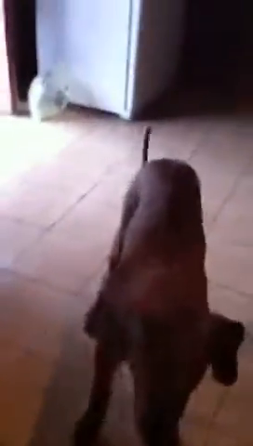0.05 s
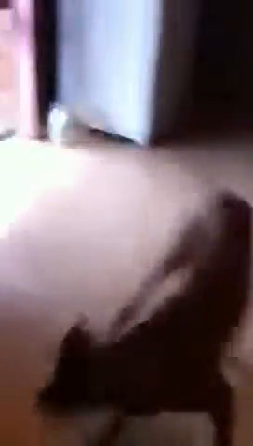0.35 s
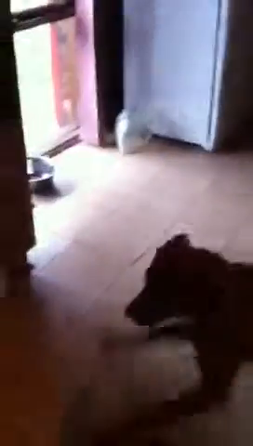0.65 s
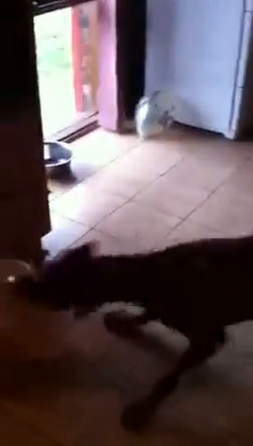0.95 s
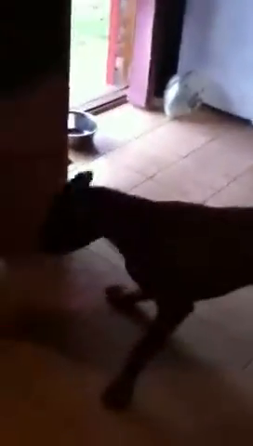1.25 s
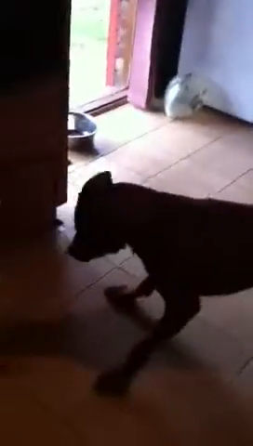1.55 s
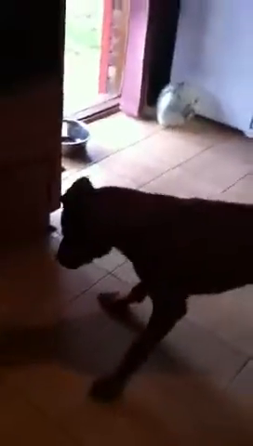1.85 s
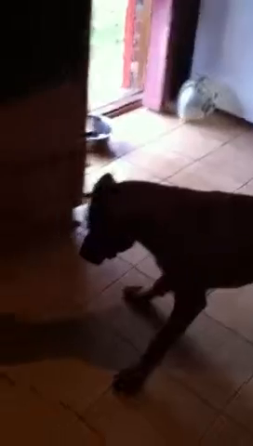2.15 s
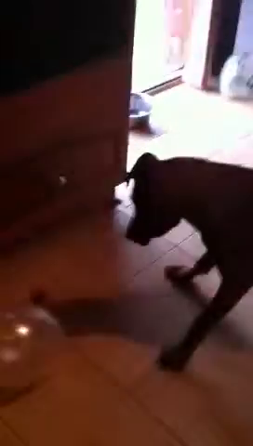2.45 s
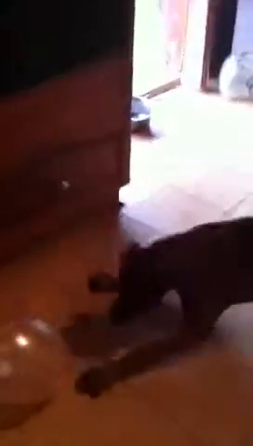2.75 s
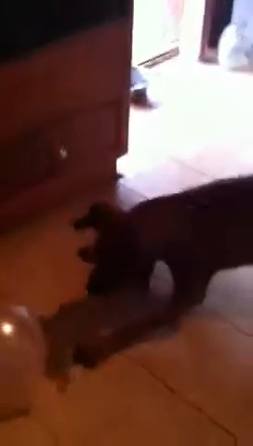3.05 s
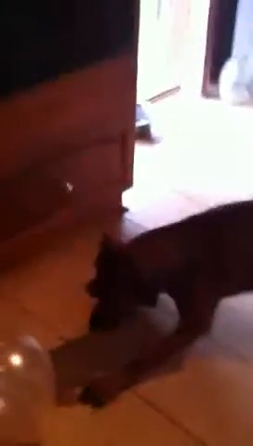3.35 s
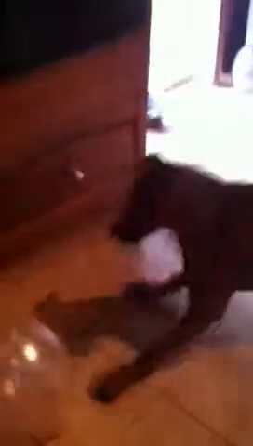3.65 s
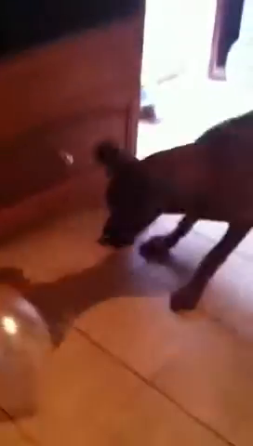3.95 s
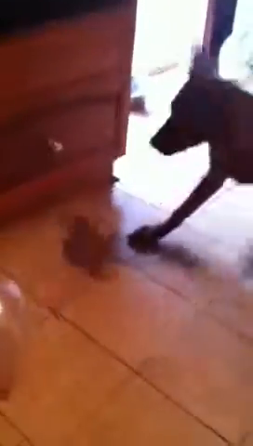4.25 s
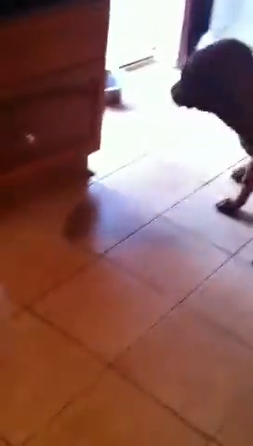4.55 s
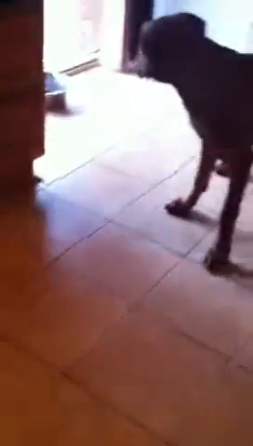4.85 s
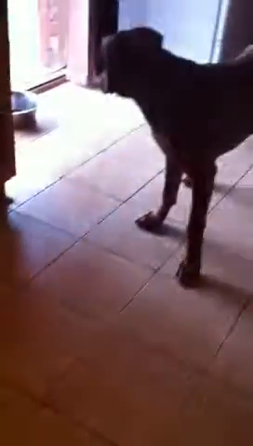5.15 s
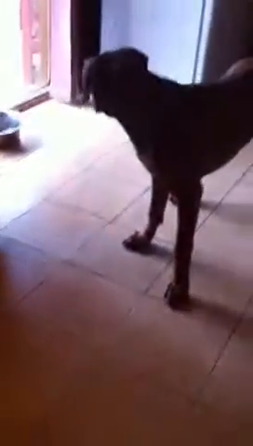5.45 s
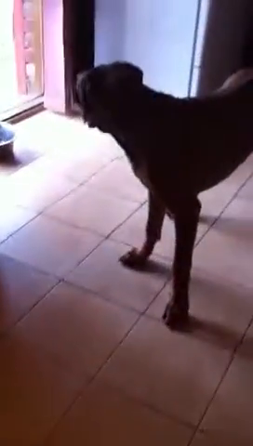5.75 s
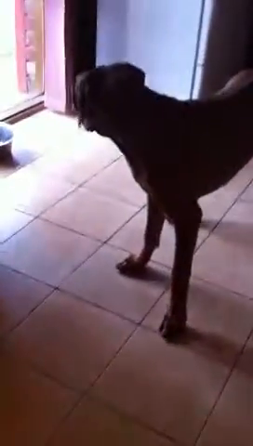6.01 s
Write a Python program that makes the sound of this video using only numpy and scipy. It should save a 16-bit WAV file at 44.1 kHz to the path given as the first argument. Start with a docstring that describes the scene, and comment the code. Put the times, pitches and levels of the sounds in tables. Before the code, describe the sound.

A puppy moves on a tiled kitchen floor close to the microphone, and the hard room rings briefly after every step. From about 0.1 to 0.9 seconds there is a quick flurry of soft pad thuds, flat paw slaps and claws clicking and skidding. Low, padded thumps follow from 1.1 to 1.6 seconds, then faint treads and the rubbing of paws and coat until about 2.4. At 2.75 seconds comes the loudest moment, a pounce with a thud, sharp slaps and a clatter of claws. Light pats and a brief slide fall between 3.1 and 3.8 seconds. A strong clicking step lands at 4 seconds, and the puppy backs away with steps at about 4.2, 4.4 and 4.6, and a very faint one at 4.8. A faint steady hiss runs throughout and is all that remains until the end at about 6 seconds.

```python
"""A tiled kitchen, where a puppy pounces and backs away close to the microphone.
Its soft pads thud as they take its weight, its flat paws trap air and slap, and its hard claws
click and skid on the glaze. Paws and coat rub on the floor between steps.
The hard room rings after every step, over a faint steady hiss."""
import sys
import numpy as np
from scipy import signal
from scipy.fft import rfft, irfft
from scipy.io import wavfile
from scipy.ndimage import uniform_filter1d

SR = 44100
rng = np.random.default_rng(int(sys.argv[2]) if len(sys.argv) > 2 else 0)


def transcribe(u):
    """Save the signal u as a 16-bit wav file named by the first command-line argument.

    u: samples, shape (n,) or (channels, n), limited to [-1, 1]; the rate is SR.
    q: integer samples, one column per channel.
    """
    v = np.clip(np.atleast_2d(u).T, -1, 1)
    q = np.round(v * 32767).astype(np.int16)
    wavfile.write(sys.argv[1], SR, q)


N = 272537
TAPS = 4096  # samples in one short contact sound
FREQS = np.fft.rfftfreq(TAPS, 1 / SR)
SPOTS = 6  # places on the floor that the contacts take in turn


def amp(db):
    """Turns decibels into a gain."""
    return 10 ** (np.asarray(db) / 20)


def unit(x):
    """Scales a sound so that its energy is 1."""
    return x / np.sqrt(np.sum(x ** 2) + 1e-20)


def look_up(points, hz):
    """Reads between the rows of a table, on a logarithmic frequency scale."""
    f, value = np.transpose(points)
    return np.interp(np.log(hz + 1), np.log(f + 1), value)


def add(mix, start_s, sound):
    """Mixes a sound in at the given time."""
    part = mix[max(round(start_s * SR), 0):][:len(sound)]
    part += sound[:len(part)]


def pulse(tone_db):
    """The shortest pulse with this tone; convolving a sound with it passes the tone on."""
    log_gain = np.log(amp(np.concatenate([tone_db, tone_db[-2:0:-1]])))
    return irfft(np.exp(np.conj(signal.hilbert(log_gain)))[:len(FREQS)])


def peak(hz, q, height_db):
    """The bump that ringing adds to a tone, in dB; a higher q makes it narrower."""
    return 10 * np.log10(1 + amp(height_db) ** 2 / (1 + (2 * q * (FREQS - hz) / hz) ** 2))


def grit(size, spread_db):
    """Sticking and slipping makes a dense stream of tiny, very uneven clicks."""
    return rng.standard_normal(size) * amp(spread_db * np.minimum(rng.exponential(1, size), 4))


def contact(skid_s, touch_s=0.0012):
    """A first touch, then a skid: the longer the skid, the more of the energy it carries."""
    skid_share = 1 - np.exp(-skid_s / touch_s)
    fade = np.exp(-np.arange(TAPS) / SR / skid_s)
    force = np.sqrt(skid_share) * unit(grit(TAPS, spread_db=6.6) * fade)
    force[0] += np.sqrt(1 - skid_share)
    # many toes land at once, so even out any pitch in the contact
    ripple_db = 10 * np.log10(uniform_filter1d(abs(rfft(force)) ** 2, size=9) + .02)
    return unit(signal.fftconvolve(force, pulse(-0.48 * ripple_db))[:TAPS])


# tone of the hiss: f/Hz, level/dB
HISS_TONE = [(18, -70.5), (30, -25), (59, -32), (117, -6.5), (174, -1.5), (294, -4.5), (335, -1), (402, -8),
             (447, -4.5), (581, -6.5), (662, -7.5), (1030, -10.5), (2210, -9.5), (4370, -16.5),
             (15800, -21)]
def hiss(level_db=-66):
    """The steady background noise of the room and the microphone."""
    tone = amp(look_up(HISS_TONE, np.fft.rfftfreq(N, 1 / SR)))
    noise = irfft(rfft(rng.standard_normal(N)) * tone, N)
    return amp(level_db) * unit(noise) * np.sqrt(N)


# how long the echoes take to fade by 60 dB: f/Hz, fade/s
ECHO_FADE = [(80, 0.32), (200, 0.78), (500, 0.62), (1500, 0.65), (3000, 0.62), (6000, 0.54), (10000, 0.44),
             (16000, 0.34)]
# how strongly the walls answer: f/Hz, level/dB
ECHO_TONE = [(60, 10.5), (150, -1), (300, -4), (600, -2), (1500, 3), (4000, -2), (9000, -0.5), (16000, -3)]
def wall_echoes():
    """The room's answer to one click: strong echoes off near furniture and a fading tail off the walls."""
    t = np.arange(SR) / SR
    build_up = 1 - np.exp(-t / 0.00079)
    echoes = unit(rng.choice([-1., 1.], SR) * (rng.random(SR) < .15) * build_up)
    hz, when, bands = signal.stft(echoes, SR, nperseg=256)
    fade_rate = np.log(1000) / look_up(ECHO_FADE, hz)[:, None]
    bands = bands * np.exp(-fade_rate * when) * np.sqrt(2 * fade_rate)
    bands *= amp(look_up(ECHO_TONE, hz))[:, None]
    tail = signal.istft(bands, SR, nperseg=256)[1][:SR]
    furniture_s = rng.uniform(0.0018, .028, size=8)
    tail[(furniture_s * SR).astype(int)] += amp(-9) * unit(rng.standard_normal(len(furniture_s)))
    return tail


# notes that ring between floor and walls: f/Hz, level/dB, time to fade by 60 dB/s
ROOM_NOTES = [(192, -36, 1), (326.7, -6.5, 0.12), (500, -4, 0.39), (633, -13, 0.17), (710, -13, 0.42)]
def standing_waves(sound):
    """Sound bouncing back and forth makes a few low notes ring on after each step."""
    t = np.arange(SR) / SR
    ring = np.zeros(SR)
    for hz, db, fade_s in ROOM_NOTES:
        fade_rate = np.log(1000) / fade_s
        ring += amp(db) * 2 * fade_rate / SR * np.exp(-fade_rate * t) * np.sin(2 * np.pi * hz * t)
    return signal.fftconvolve(sound, ring)[:N]


def room(spots):
    """All spots on the floor share the room's notes, but each has its own echoes."""
    return standing_waves(spots.sum(0)) + sum(signal.oaconvolve(x, wall_echoes())[:N] for x in spots)


# tone of rubbing on the glaze: f/Hz, level/dB
RUB_TONE = [(30, -31), (120, -6.5), (300, 2), (700, 5.5), (1200, 1.5), (2500, -0.5), (4000, -2.5),
            (8000, -7), (13000, -7.5), (16000, -14.5)]
# drags of paws and coat: t/s, length/s, level/dB, brightness/(dB per octave)
DRAGS = [(.234, .27, -50.5, -1.5), (.465, 0.085, -51, 1), (1.047, 0.094, -52, 0.5),
         (1.345, 0.047, -42, -2.5), (1.4, 0.16, -56, -3.5), (1.64, 0.093, -56.5, -5),
         (1.8, 0.041, -48, -5.5), (1.82, 0.21, -53, -5.5), (2.2, 0.15, -66, -16), (2.733, 0.026, -34.5, -1),
         (3.63, 0.17, -50, 1)]
def rubbing(catch_db=3, catch_s=0.0033):
    """Each drag or slide swells and fades, catching unevenly on the glaze."""
    out = np.zeros((SPOTS, N))
    catches = unit(uniform_filter1d(rng.standard_normal(N), int(catch_s * SR))) * np.sqrt(N)
    friction = unit(grit(N, spread_db=6) * amp(catch_db * catches)) * np.sqrt(N)
    for k, (start_s, length_s, db, brightness) in enumerate(DRAGS + slides()):
        stroke = friction[round(start_s * SR):][:round(length_s * SR)]
        stroke = stroke * signal.windows.tukey(len(stroke), .7)
        bright_db = brightness * np.log2(np.maximum(FREQS, 170) / 1000)
        tone = unit(pulse(look_up(RUB_TONE, FREQS) + bright_db))
        add(out[k % SPOTS], start_s, amp(db) * signal.fftconvolve(stroke, tone))
    return out


# the puppy shifts its weight: t/s, length/s, level/dB
WEIGHT_SHIFTS = [(1.28, 0.3, 8.5), (1.867, 0.049, -23), (2.131, .3, -8)]
def treads(count=5, fade_db=-8.5, middle_hz=222.5, spread_octaves=0.35):
    """Each shift is a few soft, uneven treads that grow lighter; gives more landings for pads()."""
    rows = []
    for start_s, length_s, db in WEIGHT_SHIFTS:
        for k, (late, pitch) in enumerate(rng.random((count, 2))):
            progress = (k + late) / count
            hz = middle_hz * 2 ** (spread_octaves * (2 * pitch - 1))
            rows.append((start_s + length_s * progress, db + fade_db * progress, hz))
    return rows


# tone of a claw on tile: f/Hz, level/dB
CLAW_TONE = [(30, -22), (120, -52), (300, -13.5), (700, -10), (1500, -13), (3000, -10), (5000, -10),
             (8000, -14), (13000, -15), (16000, -27)]
# claws striking the glaze: t/s, level/dB, ring f/Hz, skid time/s
CLAW_CLICKS = [(.1422, -9.5, 4420, 0.00073), (.1432, -11.5, 11200, .0012), (.2269, -3, 3000, 0.0017),
               (.562, -9, 3700, 0.007), (.8222, -6.5, 4700, 0.004), (.866, -0.5, 3330, .016),
               (1.213, -13.5, 7000, .011), (2.283, -29.5, 3950, .003), (2.7575, 5, 4100, 0.00095),
               (2.77, 4, 2560, 0.0047), (2.793, -11, 8900, 0.0038), (2.8926, -4, 5200, 0.0045),
               (3.54, -27, 5000, .0053), (3.6349, -13, 3370, 0.00049), (3.9716, 4, 2680, 0.0095),
               (3.976, 5.5, 2120, 0.0098), (3.9879, 9.5, 3160, 0.0027), (4.177, 2.5, 3400, 0.0068),
               (4.3748, 3.5, 3350, 0.0032), (4.5765, 0.5, 4650, 0.0059), (4.582, -3.5, 2850, .0045),
               (4.794, -19.5, 3000, 0.013)]
def claws():
    """Hard claws tick, ring for a moment and skid."""
    out = np.zeros((SPOTS, N))
    for k, (start_s, db, hz, skid_s) in enumerate(CLAW_CLICKS):
        # a small, high-ringing claw moves little air below its ring
        thin_below_hz = 0.25 * hz * 2 ** (0.0056 * db)
        thin_db = -10 * np.log10(1 + (thin_below_hz / (FREQS + 30)) ** 2)
        ring_db = 4.5 + 0.5 * np.log2(skid_s / 0.0022)  # a longer skid rings a little more
        tick = pulse(look_up(CLAW_TONE, FREQS) + thin_db + peak(hz, q=4.7, height_db=ring_db))
        add(out[k % SPOTS], start_s, amp(db) * signal.fftconvolve(contact(skid_s, touch_s=0.0028), tick))
    return out


# tone of a flat paw on tile: f/Hz, level/dB
PAW_TONE = [(30, -35), (90, -40), (200, -19), (450, -10), (700, -10.5), (1000, -15.5), (1600, -21.5),
            (3000, -21.5), (6000, -34), (13000, -32), (16000, -42)]
# flat slaps of a paw: t/s, level/dB, trapped air f/Hz, settling time/s
PAW_SLAPS = [(.341, 5.5, 970, 0.00097), (.5625, 11, 517, 0.011), (.574, 10.5, 534, 0.013),
             (0.819, 7, 457, 0.0011), (0.8218, 16, 1650, .002), (.834, 4.5, 736, 0.0063),
             (.849, 10, 1700, 0.0029), (.854, 9, 545, 0.0021), (1.158, -1.5, 600, 0.0066),
             (1.213, -1, 655, 0.02), (2.7505, 19.5, 640, 0.003), (2.7696, 22, 597, 0.0012),
             (2.776, 12, 1580, 0.0044), (2.797, 6.5, 1270, 0.0089), (2.812, 6.5, 610, 0.0054),
             (3.157, -17, 555, 0.003), (3.5158, -17, 546, 0.00084), (3.738, -5.5, 925, 0.024),
             (3.929, -14, 656, 0.0014), (3.9612, -2.5, 696, 0.0022), (3.9886, 14, 690, 0.0029),
             (4.172, 2, 647, 0.0094), (4.378, 1, 526, 0.0036), (4.584, -2.5, 637, 0.0029),
             (4.797, -18.5, 590, 0.0046)]
def paws():
    """A flat paw traps a pocket of air and claps, then settles on the tile."""
    out = np.zeros((SPOTS, N))
    for k, (start_s, db, hz, settle_s) in enumerate(PAW_SLAPS):
        octaves_up = np.log2(hz / 606)  # a smaller, higher pocket rings less clearly and claps brighter
        hollow_db = 15 - 0.1777 * db - 2 * octaves_up  # a harder slap squeezes the air out
        pocket_db = peak(hz, q=7.5 * 2 ** (-0.54 * octaves_up), height_db=hollow_db)
        bright_db = 0.87 * octaves_up * np.log2(np.clip(FREQS, 100, 3000) / 1000)
        clap = pulse(look_up(PAW_TONE, FREQS) + bright_db + pocket_db)
        force = contact(settle_s, touch_s=0.0023)
        add(out[k % SPOTS], start_s, amp(db) * signal.fftconvolve(force, clap))
    return out


def slides(brightness=0.4):
    """A settling paw slides on, louder after a harder slap; gives more drags for rubbing()."""
    return [(start_s, 9.46 * settle_s, -53.5 + .5 * db, brightness)
            for start_s, db, _, settle_s in PAW_SLAPS]


# tone of a soft pad patting the tile: f/Hz, level/dB
PAD_TONE = [(30, -45), (80, -43.5), (150, -10.5), (250, -7.5), (400, -8.5), (580, -8), (900, -25),
            (2000, -35.5), (8000, -46), (16000, -46.5)]
# landings of the pads: t/s, level/dB, boom f/Hz
LANDINGS = [(.2462, 20.5, 255), (.2555, 19, 338), (.291, 17.5, 181), (.344, 12.5, 248), (.508, 14, 210),
            (1.071, 8, 240), (1.162, 15.5, 178), (1.1805, 19, 247), (1.205, 16.5, 168), (1.224, 15.5, 273),
            (1.817, 3, 215), (1.987, -4.5, 221), (2.292, -3, 218), (2.7505, 26.5, 287), (2.7615, 21.5, 211),
            (2.785, 16.5, 300), (3.157, 9, 210), (3.519, -1, 221), (3.54, 8, 196), (3.987, 16.5, 334),
            (4.378, 0, 192), (4.582, 1.5, 196)]
def pads(squash_s=0.000059, firm_s=0.0018, sag=0.31, sag_s=0.0064):
    """A pad takes the weight with a short, low boom; the firmer it lands, the more it pats and brushes."""
    out = np.zeros((SPOTS, N))
    t = np.arange(TAPS) / SR
    push = t * np.exp(-t / squash_s)
    pat = pulse(look_up(PAD_TONE, FREQS))
    bass_cut = signal.butter(3, 125, "high", fs=SR, output="sos")  # the boom carries little deep bass below 125 Hz
    above_boom = signal.butter(2, 900, "high", fs=SR, output="sos")
    # the boom starts high and sinks to its pitch as the pad spreads
    bent_time = t + sag * sag_s * (1 - np.exp(-t / sag_s))
    for k, (start_s, db, hz) in enumerate(LANDINGS + treads()):
        load_s = .0046 * (245 / hz) ** 0.54  # a deeper boom comes from taking the weight more slowly
        swell = t * np.exp(-t / load_s)
        boom = signal.sosfilt(bass_cut, 2 * swell / swell.sum() * np.sin(2 * np.pi * hz * bent_time))
        brush = signal.sosfilt(above_boom, contact(skid_s=0.025))
        touch = signal.fftconvolve(push / push.sum() + amp(8.5) * brush, pat)[:TAPS]
        add(out[k % SPOTS], start_s, amp(db) * (amp(-2.5) * boom + firm_s / load_s * touch))
    return out


def scene():
    """Every contact reaches the microphone both directly and by way of the room."""
    pad, paw, claw, rub = pads(), paws(), claws(), rubbing()
    direct = (pad + paw + claw + amp(-5) * rub).sum(0)
    into_room = amp(1) * pad + amp(3) * paw + amp(3.5) * claw + amp(-2.5) * rub
    return (direct + room(into_room) + hiss())[None]


def record(dry):
    """Cuts away the highest treble, above 16000 Hz."""
    treble_cut = signal.firwin(511, 16000, window=("kaiser", 9), fs=SR)
    return signal.oaconvolve(dry, treble_cut[None], "same")


dry = scene()
out = record(dry)
transcribe(out)
```